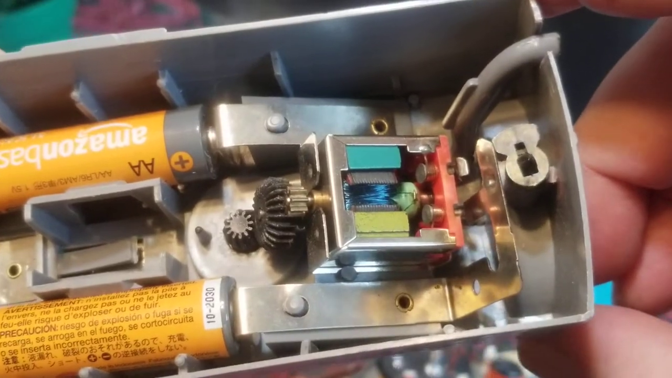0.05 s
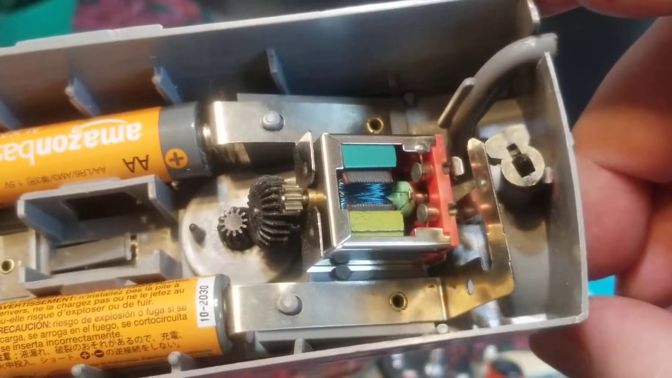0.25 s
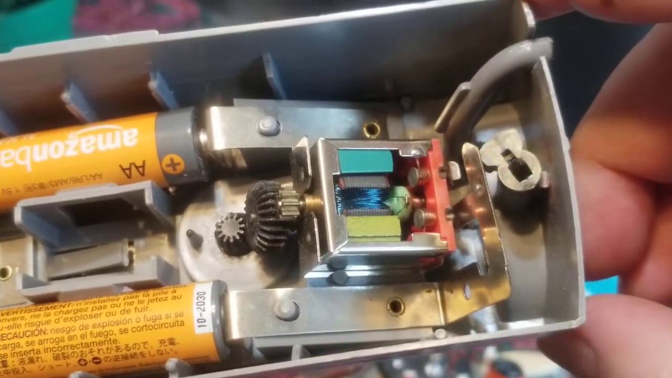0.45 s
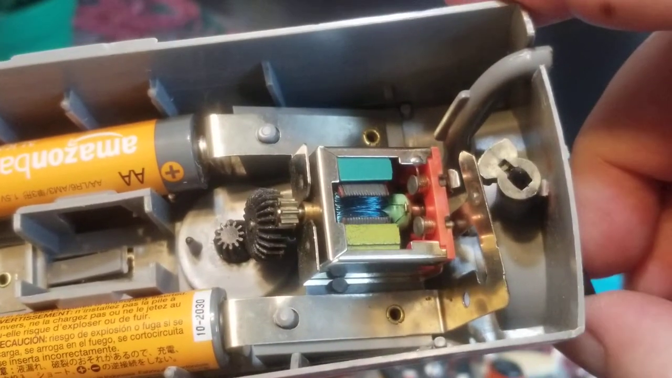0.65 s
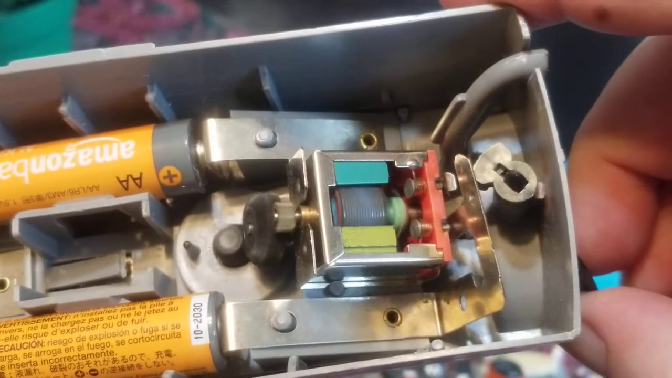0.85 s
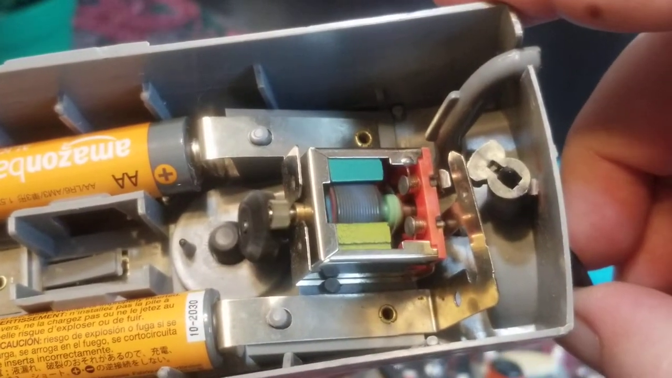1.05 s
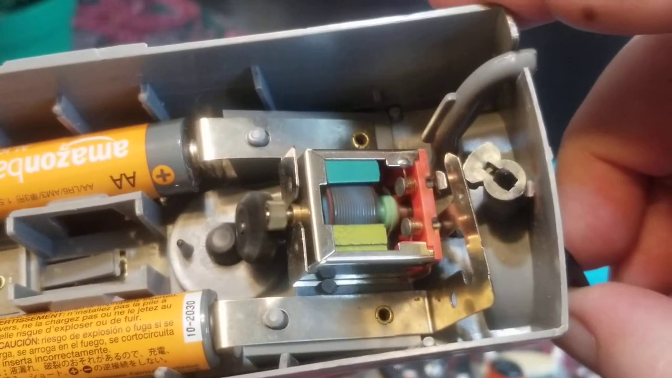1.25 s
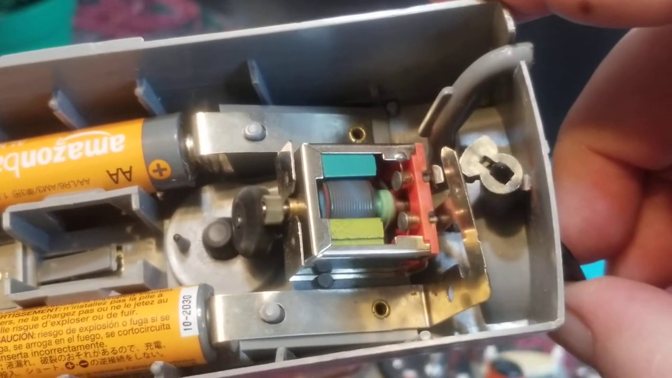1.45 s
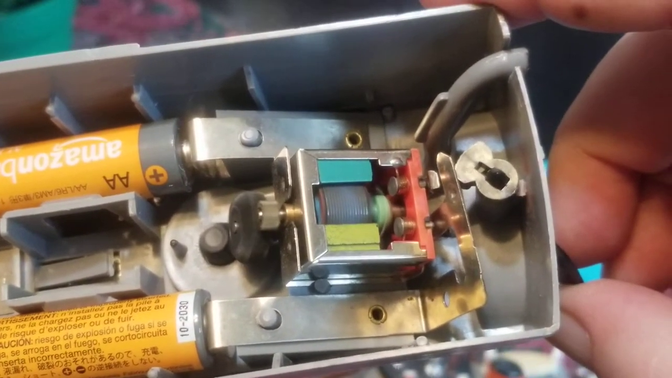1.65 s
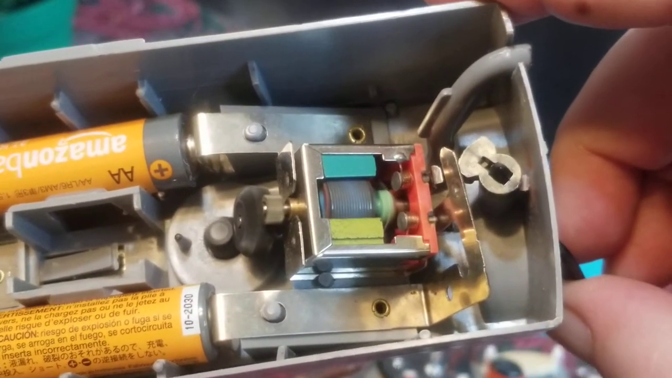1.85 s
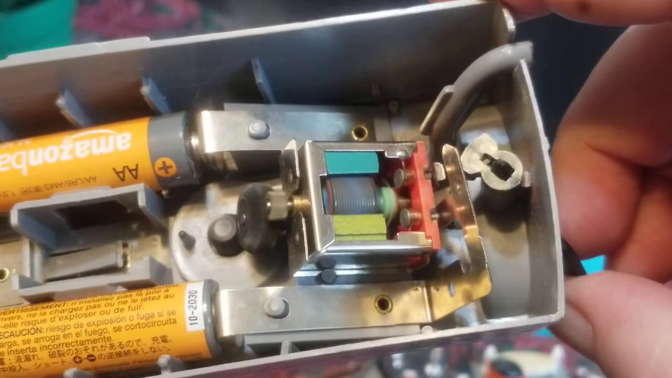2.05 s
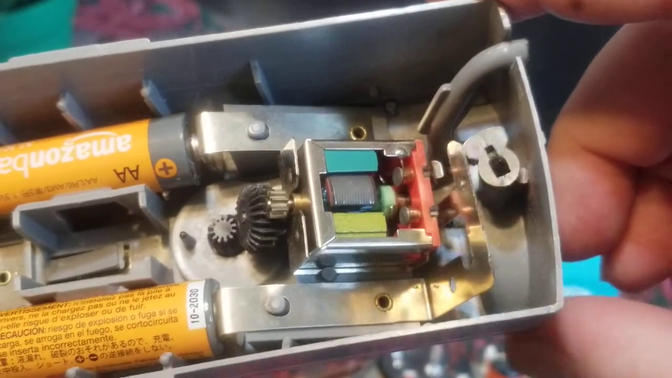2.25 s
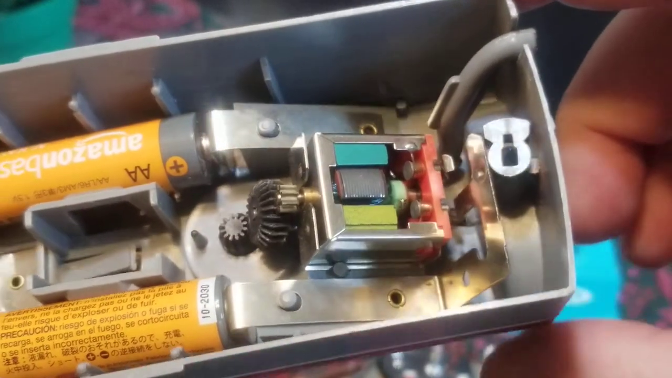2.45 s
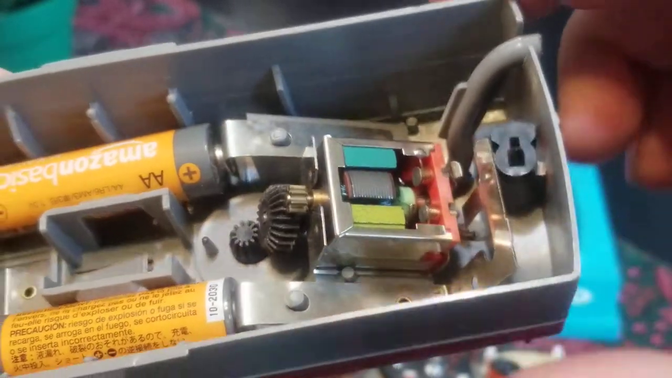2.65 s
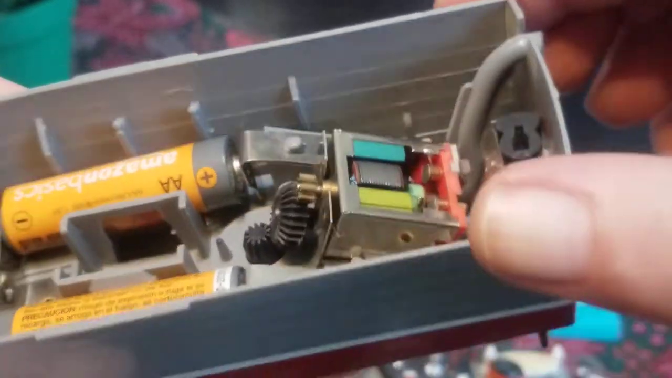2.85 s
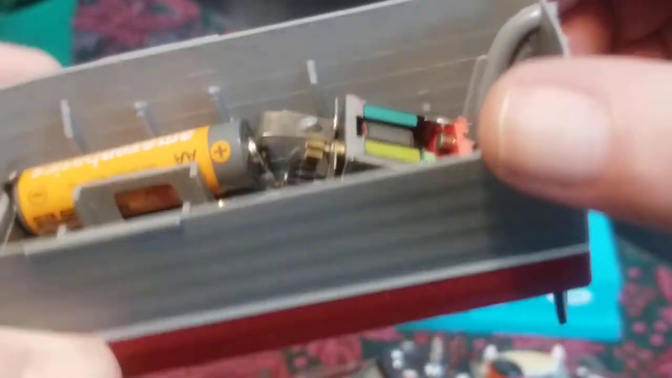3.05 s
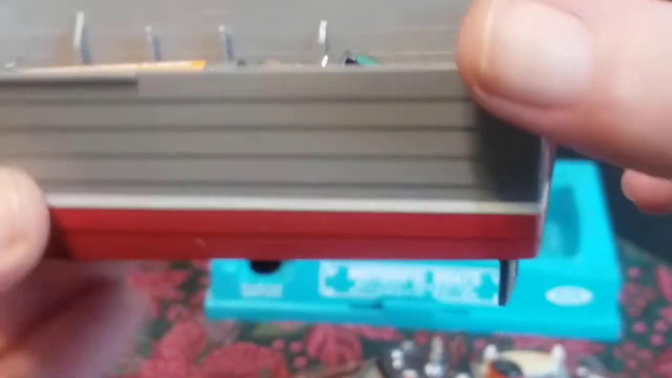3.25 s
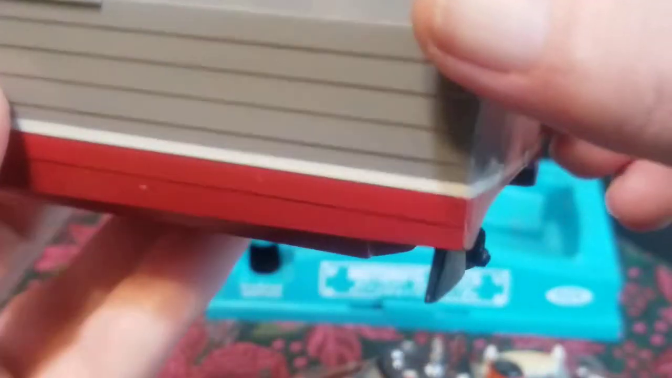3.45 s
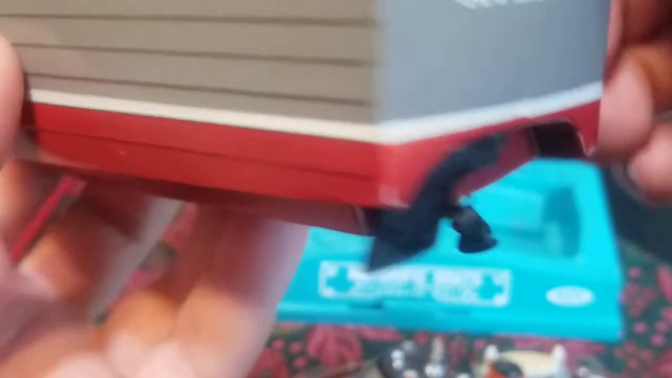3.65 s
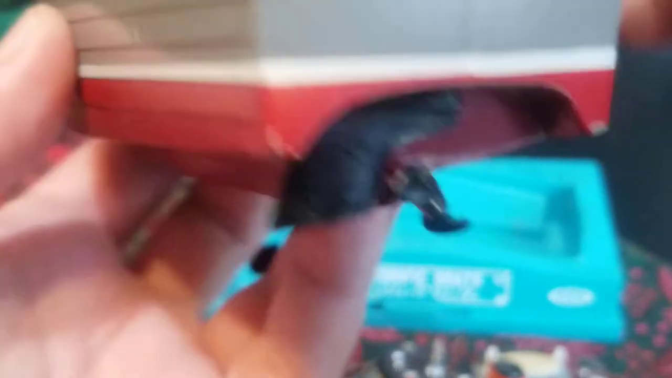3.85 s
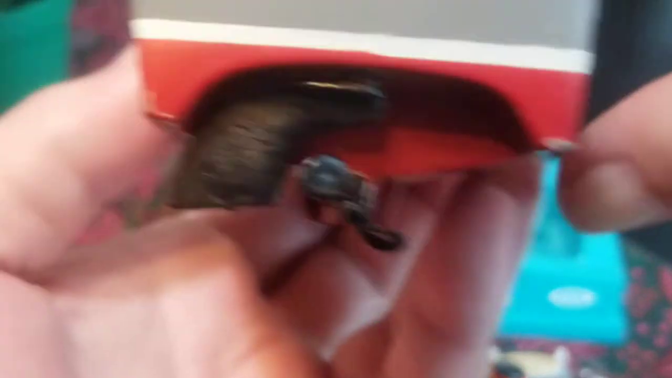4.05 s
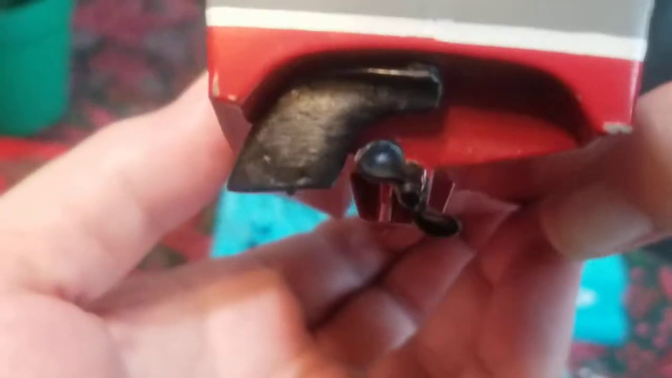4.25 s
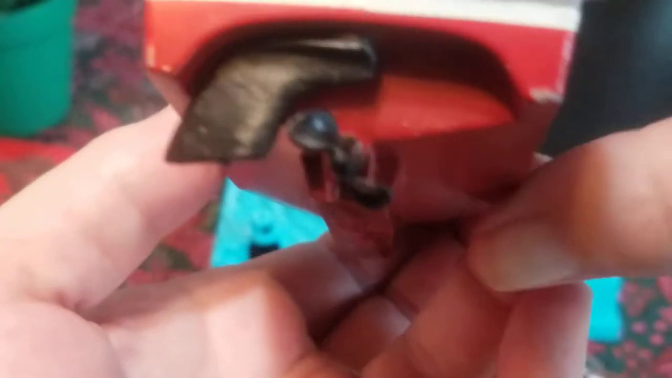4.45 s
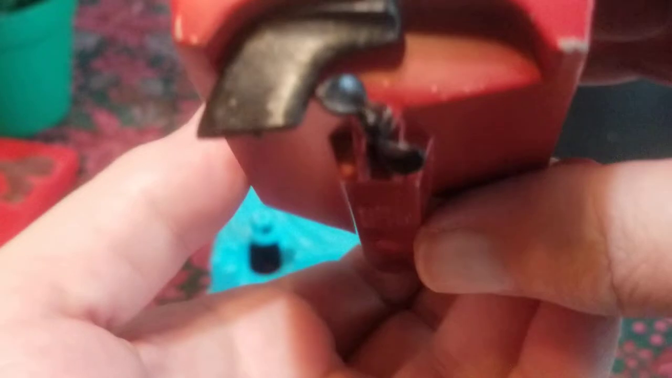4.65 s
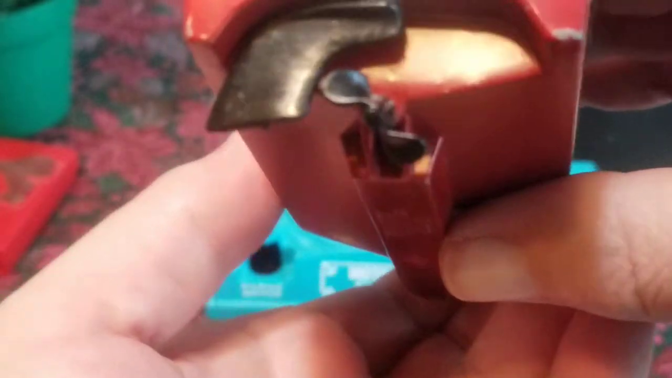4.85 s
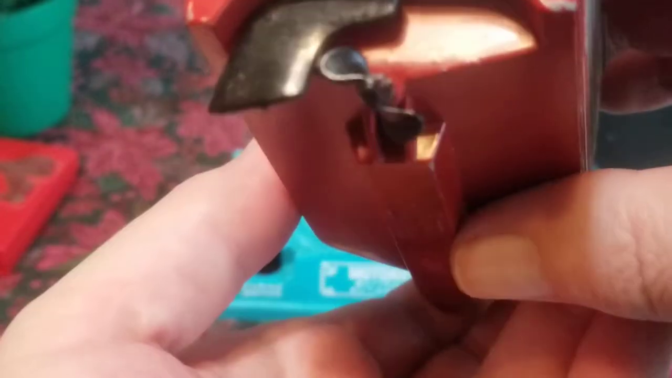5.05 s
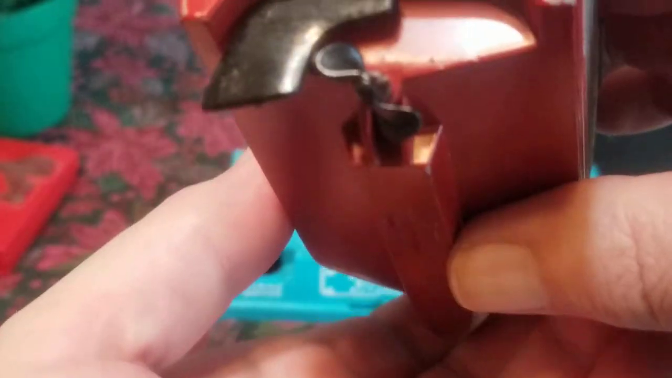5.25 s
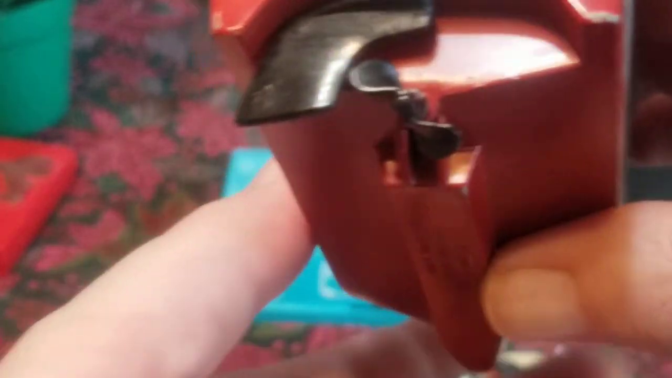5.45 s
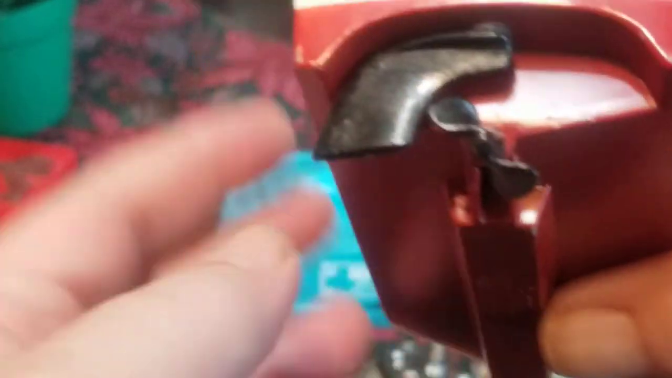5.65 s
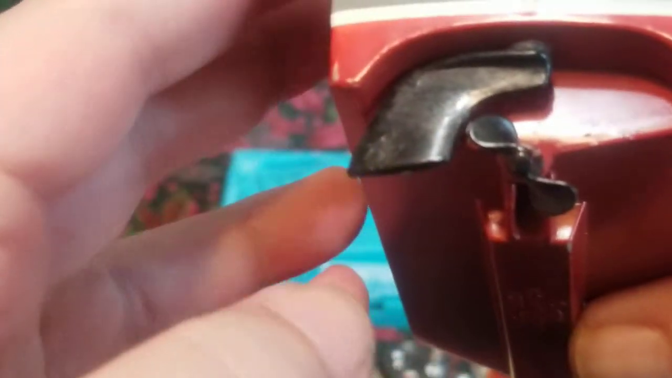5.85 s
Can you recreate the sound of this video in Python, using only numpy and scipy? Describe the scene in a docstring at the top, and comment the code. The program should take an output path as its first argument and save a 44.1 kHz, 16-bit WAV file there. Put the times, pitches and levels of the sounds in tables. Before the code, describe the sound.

Low appliance hum, then loud raspy chatter of loose toy gears in a plastic hull, cut short, followed by faint handling clicks, rubs and squeaks.

```python
"""An appliance hums over soft hiss; then a toy boat's small battery motor runs for over a second.
Its loose gear teeth strike, slap and grind, and the plastic hull rings with them.
Fingers then turn the hull over: light taps, one click, rubbing, and a few thin squeaks in the room.
The hum is made of sines, the gears and rubbing of tiny impacts, the taps of brief knocks and noise.
A gain control turns everything down while the gears are loud, so the hum sinks with them."""
import sys
import numpy as np
from scipy import signal
from scipy.fft import rfft, irfft, next_fast_len
from scipy.io import wavfile
from scipy.ndimage import uniform_filter1d, map_coordinates

SR = 44100
rng = np.random.default_rng(int(sys.argv[2]) if len(sys.argv) > 2 else 0)


def int16_out(signal):
    """Quantize to a 16-bit WAV file."""
    q = np.round(np.clip(np.atleast_2d(signal).T, -1, 1) * 32767)
    wavfile.write(sys.argv[1], SR, q.astype(np.int16))


N = 260391
T = np.arange(N) / SR  # time of each sample in seconds

# How hard the gear teeth press as they mesh. Each row: time in seconds, relative force in dB.
MESH_FORCE = [(0.82, -23.5), (0.92, -25), (1.2, -26), (1.31, -28), (1.39, -26.5), (1.62, -27),
              (1.79, -28.5), (1.9, -28.5), (2.18, -26.5)]


def amp(db):
    """Turn decibels into a gain."""
    return 10 ** (np.asarray(db) / 20)


def unit(x):
    """Scale x to an rms of 1."""
    return x / np.sqrt(np.mean(x ** 2) + 1e-20)


def along(points, hz):
    """Read each column of a table at the frequencies hz, on a logarithmic frequency axis."""
    f, *columns = np.transpose(points)
    return np.array([np.interp(np.log(hz + 1), np.log(f + 1), column) for column in columns])


def curves(rows):
    """Draw each column of a table as straight lines over time, one value per sample."""
    s, *columns = np.transpose(rows)
    return np.array([np.interp(T, s, column) for column in columns])


def wobble(rate):
    """Draw a smooth random curve through rate random points a second."""
    knots = rng.standard_normal(int(N * rate / SR) + 4)
    coarse = T[::16]  # every 16th sample is enough
    return np.interp(T, coarse, map_coordinates(knots, [coarse * rate]))


def filtered(x, response):
    """Multiply the spectrum of x by a response, which may be complex."""
    size = next_fast_len(N + SR // 4)
    hz = np.fft.rfftfreq(size, 1 / SR)
    return irfft(rfft(x, size) * response(hz), size)[..., :N]


def tones(lines, drift):
    """Add sines whose phase wanders slowly, the higher ones more."""
    wander = wobble(6)
    total = 0
    for hz, db in lines:
        turns = hz * (T + drift * wander) + rng.random()
        total = total + amp(db) * np.sin(2 * np.pi * turns)
    return np.sqrt(2) * total


def background(rotor_hz=58.92, air_db=-57, flutter_db=0.5):
    """A turning motor hums at multiples of its speed, over a soft rush and a faint whine on the left."""
    # The appliance's motor. Each row: multiple of its speed, relative level in dB.
    hum_lines = [(1, -50.5), (2, -66), (3, -62.5), (4, -57.5), (5, -64.5), (6, -62), (7, -70.5), (8, -71.5),
                 (9, -77), (10, -83.5), (11, -82.5), (12, -92.5), (16, -91), (17, -87.5), (18, -97),
                 (19, -93.5), (21, -95.5), (23, -92.5)]
    # Mains hum and a slower rotor. Each row: frequency in Hz, relative level in dB.
    other_lines = [(49.1, -65.5), (120, -66.5), (196.5, -65.5), (272, -71.5), (393, -70)]
    # Faint steady whine. Each row: frequency in Hz, relative level in dB.
    whine_lines = [(6498, -102), (7127, -102.5), (7364, -103.5), (7957, -99)]
    # Strength of hum and rush at the microphones. Each row: time in seconds, gain in dB.
    nearness = [(0, -3), (3.22, -2.5), (3.4, 0), (4.3, -0.4), (5.1, -0.86), (5.9, -0.15)]
    # Room air and microphone hiss. Each row: frequency in Hz, relative left dB, relative right dB.
    hiss_color = [(25, -88.5, -95), (70, -91, -93), (114, -99.5, -96.5), (163, -83.5, -85),
                  (268, -88.5, -87.5), (423, -89, -90), (527, -100, -92), (810, -111, -108),
                  (1200, -112, -111), (2080, -122, -123), (3200, -128, -129), (5285, -129, -131),
                  (7900, -115, -136), (9100, -116, -135), (10700, -108, -120), (12900, -114, -116),
                  (15500, -117, -116)]
    # How alike the hiss is left and right. Each row: frequency in Hz, likeness (1 is identical).
    likeness = [(60, 0.54), (250, 0.67), (500, 0.14), (1000, 0.43), (2500, .15), (10000, .05)]

    hum = tones([(round(k) * rotor_hz, db) for k, db in hum_lines], drift=.00003)
    hum = hum + tones(other_lines, drift=.0001)

    def middle_and_side(hz):
        """Share the noise between a common middle and an opposite side."""
        angle = np.arccos(np.clip(along(likeness, hz)[0], -1, 1)) / 2
        return np.array([np.cos(angle), np.sin(angle)])

    mid, side = filtered(rng.standard_normal((2, N)), middle_and_side)
    air = np.array([mid + side, mid - side])
    air = unit(filtered(air, lambda hz: amp(along(hiss_color, hz))))
    air_gain = amp(air_db + flutter_db * wobble(4))
    whine = tones(whine_lines, drift=.00002) * np.array([[2], [0]])  # left only
    return amp(curves(nearness)) * (hum + air_gain * air) + whine


def grains(rate, scatter_db):
    """Make about rate tiny impacts a second, irregular in time and size, with an rms of 1."""
    chance, size, side = rng.random(N), rng.standard_normal(N), rng.choice([-1, 1], N)
    impact_size = amp(scatter_db * np.clip(size, -2, 2))
    return unit((chance < rate / SR) * side * impact_size)


def scattered(impacts, t30, direct):
    """Each impact arrives directly, then scatters briefly in the open hull, differently at each side."""
    # the scatter's energy falls by 30 dB in t30 seconds
    energy = signal.lfilter([1], [1, -amp(-60 / (t30 * SR))], impacts ** 2)
    scatter = unit(np.sqrt(energy) * rng.standard_normal((2, N)))
    share = np.clip(direct, 0, 1)  # direct share of the power
    return np.sqrt(share) * impacts + np.sqrt(1 - share) * scatter


def radiated(x, band=lambda hz: 1, size=2048):
    """The hull rings after each push, never before, and sounds stronger or weaker at each pitch."""
    # What gears, frame and hull radiate. Each row: frequency in Hz, relative left dB, relative right dB.
    hull_color = [(199, -44.5, -43.5), (700, -39, -43), (1130, -21.5, -27.5), (1500, -18, -25.5),
                  (1940, -13.5, -20), (2338, -23, -29), (2840, -12, -25.5), (3130, -19, -28),
                  (3520, -12, -26.5), (4140, -12, -28), (4647, -17, -30), (5900, -12.5, -27.5),
                  (6420, -15.5, -43), (7740, -1.5, -31.5), (7740, -4.5, -39), (9200, -3, -34),
                  (10120, 5, -12), (11600, 6, -8.5), (12200, 2, -9.5), (14200, -5, -8.5),
                  (15800, -12.5, -19.5)]
    hz = np.fft.rfftfreq(size, 1 / SR)
    # folding the cepstrum puts all the ringing after the push
    cepstrum = irfft(np.log(amp(along(hull_color, hz)) * band(hz) + 1e-6))
    cepstrum[:, 1:size // 2] *= 2
    cepstrum[:, size // 2 + 1:] = 0
    ring = irfft(np.exp(rfft(cepstrum)))
    ring = ring / np.linalg.norm(ring[0])  # unit power gain on the left
    return signal.oaconvolve(np.atleast_2d(x), ring, axes=1)[:, :N]


def shifting(x, depth_db, size=1024):
    """The point of contact moves, so different resonances stand out for a few hundredths of a second."""
    spectrum = signal.stft(x, nperseg=size)[2]
    field = rng.standard_normal(spectrum.shape[1:])
    field = uniform_filter1d(field, size=9, axis=0)  # neighboring frequencies
    field = uniform_filter1d(field, size=4, axis=1)  # neighboring moments
    return signal.istft(spectrum * amp(depth_db * unit(field)), nperseg=size)[1][:, :N]


def drive(on_s=0.8155, off_s=2.186, spin_up_db=8, spin_up_s=0.16, coast_db_per_s=1105):
    """The motor starts at once, gains level as it spins up, and dies away very fast once off."""
    running, coasting = np.maximum(T - on_s, 0), np.maximum(T - off_s, 0)
    gain_db = -spin_up_db * np.exp(-running / spin_up_s) - coast_db_per_s * coasting
    return (T > on_s) * amp(gain_db)


def tooth_force(mesh_db=1.94, slap_db=1.0, chatter_per_s=110, chatter_db=1.24,
                slap_peak_s=0.0022, slap_width_s=.0058):
    """Meshing force flutters with light chatter; hard slaps swell and fade on top."""
    # The gear jolts at switch-on, then at times rides up and slaps back.
    # Each row: moment of contact in seconds, relative strength in dB.
    slap_list = [(0.818, -28.5), (0.8444, -26.5), (0.8669, -22), (0.9564, -21.5), (0.9837, -23.5),
                 (0.9964, -23.5), (1.0715, -18), (1.0904, -18.5), (1.1338, -18), (1.1644, -19.5),
                 (1.2284, -21), (1.2545, -23), (1.3977, -27), (1.4232, -19), (1.5219, -24), (1.5918, -19),
                 (1.6117, -21.5), (1.6404, -20.5), (1.6786, -18.5), (1.7414, -19.5), (1.8153, -21.5),
                 (1.947, -21), (1.9594, -21), (2.0413, -21), (2.0712, -22)]
    mesh = amp(curves(MESH_FORCE)[0] + mesh_db + chatter_db * wobble(chatter_per_s))
    slaps = np.zeros(N)
    for s, db in slap_list:
        from_peak = (T - s - slap_peak_s) / slap_width_s
        slaps += amp(db + slap_db) * np.exp(-from_peak ** 2)
    return np.hypot(mesh, slaps)


def gears(split_hz=7000, grind_hz=750, rasp_db=5.0, knock_db=-6.5, grind_db=-30,
          hardening=1.24, usual_force_db=-21):
    """Loose teeth strike in a dense stream; hard slaps knock the hull more, over a low grinding."""
    strikes = grains(rate=3000, scatter_db=0.5)
    gain = amp(wobble(220)) * drive()
    teeth = gain * scattered(strikes, t30=0.0019, direct=0.53)
    inside = gain * scattered(strikes, t30=0.0056, direct=0.35)
    sliding = gain * amp(curves(MESH_FORCE)[0]) * rng.standard_normal(N)
    force = tooth_force()
    # hull knock grows by hardening dB for each dB of force
    knock = force * (force / amp(usual_force_db)) ** (hardening - 1)

    def below(hz, edge):
        """Share of power kept below an edge in Hz."""
        return 1 / (1 + (hz / edge) ** 16)

    bright = amp(rasp_db) * radiated(force * teeth, lambda hz: np.sqrt(1 - below(hz, split_hz)))
    dull = amp(knock_db) * radiated(knock * inside, lambda hz: np.sqrt(below(hz, split_hz)))
    grind = amp(grind_db) * radiated(sliding, lambda hz: np.sqrt(below(hz, grind_hz)))
    return shifting(bright, depth_db=1.46) + shifting(dull + grind, depth_db=2.0)


def room(x):
    """A small room answers differently at each microphone, its treble mostly dying sooner."""
    # How long the room rings. Each row: frequency in Hz, time to fall by 60 dB in seconds.
    ring_times = [(300, 0.49), (2000, .28), (8000, 0.12), (14000, 0.13)]
    hz, t, noise = signal.stft(rng.standard_normal((2, SR // 3)), SR, nperseg=256)
    decay = amp(-60 * t / along(ring_times, hz).T)
    tail = signal.istft(noise * decay, SR, nperseg=256)[1]
    tail = np.pad(tail / np.linalg.norm(tail[0]), [(0, 0), (130, 0)])  # starts 130 samples late
    return signal.oaconvolve(np.atleast_2d(x), tail, axes=1)[:, :N]


def taps(t60=0.049, blow=12, crunch_share=0.77):
    """Each tap or slap is a clean blow on the shell and a brief crunch, different at each microphone."""
    # A last gear tooth slaps as the motor stops; later, fingers and loose parts tap the boat.
    # Each row: start in seconds, relative tick level in dB, relative shell knock level in dB.
    tap_list = [(2.209, -23.5, -59), (2.949, -58, -69), (3.024, -54.5, -66), (3.033, -55, -71),
                (3.1951, -56, -81), (3.466, -62, -61), (3.68, -60, -70), (4.047, -56, -52),
                (4.0522, -48, -38), (4.0546, -39, -36.5), (4.8266, -55.5, -70)]
    # Resonances of the plastic shell. Each row: frequency in Hz, width in Hz, relative level in dB.
    shell_modes = [(1404, 196, -6.5), (2075, 190, -11.5), (2750, 280, -15.5), (4570, 840, -20),
                   (7600, 4200, -26)]
    ticks, knocks = np.zeros((2, N)), np.zeros((2, N))
    t = np.arange(SR // 10) / SR
    for s, tick_db, knock_db in tap_list:
        crunch = rng.standard_normal((2, len(t))) * amp(-60 * t / t60)
        start = round(s * SR)
        span = slice(start, start + len(t))
        ticks[:, span] += amp(tick_db) * crunch
        knocks[:, span] += amp(knock_db) * (blow * (t == 0) + crunch_share * crunch)

    def shell(f):
        """Add the shell's resonances with alternating sign."""
        total = 0
        for k, (center, width, db) in enumerate(shell_modes):
            damping = 1j * f * width
            total = total + (-1) ** k * amp(db) * damping / (center * center - f * f + damping)
        return total

    return radiated(ticks) + amp([[17], [13]]) * filtered(knocks, shell)


def fingers(scuff_db=-19, scuff_hz=4600):
    """Skin slips over plastic in tiny grains: a hiss from the hull and a duller scuff at the contact."""
    # Skin slides over the hull. Each row: middle in seconds, half length in seconds, relative level in dB.
    rub_list = [(3.049, 0.03, -65.5), (3.482, 0.063, -69.5), (4.576, 0.011, -60), (4.629, 0.018, -58),
                (4.71, 0.029, -63.5), (4.883, .04, -65.5), (4.983, 0.024, -64), (5.7, 0.12, -76.5)]
    stroke = sum(amp(db) * np.exp(-.5 * ((T - s) / half) ** 2) for s, half, db in rub_list)
    skin = scattered(grains(rate=1400, scatter_db=5.5), t30=0.012, direct=0.057)
    slips = stroke * skin * amp(0.53 * wobble(33))

    def scuff(hz):
        """One broad resonance around scuff_hz."""
        return 2 / (1 + 1j * (hz / scuff_hz - scuff_hz / (hz + 1)))

    return radiated(slips) + amp(scuff_db) * filtered(slips, scuff)


def squeaks(waver_hz=190):
    """Thin, unsteady squeals swell and die at once, heard largely through the room."""
    # Each row: start in seconds, frequency in Hz, swell time in seconds, relative level in dB.
    squeak_list = [(4.161, 12950, 0.0017, -42), (4.169, 13160, 0.0013, -33.5), (4.615, 2344, 0.011, -79),
                   (4.635, 13550, .003, -42), (4.644, 13600, 0.0019, -38.5), (4.675, 2400, 0.0051, -76),
                   (4.715, 2410, 0.0066, -84)]
    out = np.zeros(N)
    for s, hz, swell, db in squeak_list:
        u = np.maximum(T - s, 0) / swell
        envelope = u * np.exp(1 - u)  # peaks after one swell time
        phase = 2 * np.pi * np.cumsum(hz + waver_hz * wobble(1100)) / SR
        out += amp(db) * envelope * np.sin(phase)
    return out * amp([[2], [4]]) + amp(7.5) * room(out)


def scene():
    """The boat is close to the left microphone; once turned over, more of its sound comes by the room."""
    motor = gears()
    handling = taps() + fingers()
    room_feed = motor * amp([[-12], [-5]]) + handling * amp([[-9], [-5]])
    return background() + motor + handling + room(room_feed) + squeaks()


def gain_control(x, lift_db=8, threshold_db=-36, hold_s=2.2, attack_db_per_s=32,
                 release_db_per_s=13.0, size=441):
    """Quiet passages are lifted; a loud sound pulls the lift down, and it returns after a hold."""
    blocks = x[:, :N // size * size].reshape(2, -1, size)
    power = np.mean(blocks ** 2, axis=(0, 2))
    excess = np.clip(10 * np.log10(power + 1e-12) - threshold_db, 0, lift_db)
    step, cut = size / SR, [0]
    for k in range(len(excess)):
        wanted = excess[max(0, k - int(hold_s / step)):k + 1].max()  # loudest block within the hold
        change = np.clip(wanted - cut[-1], -release_db_per_s * step, attack_db_per_s * step)
        cut.append(cut[-1] + change)
    return x * amp(lift_db - np.interp(T, np.arange(len(cut)) * step, cut))


def record(dry, top_hz=15830):
    """Ride the gain, round off the highest peaks and remove the treble above top_hz."""
    x = gain_control(dry)
    rounded = x / (1 + np.abs(x / .85) ** 6) ** (1 / 6)
    return filtered(rounded, lambda hz: np.clip((top_hz - hz) / 250 + .5, 0, 1))


dry = scene()
out = record(dry)
int16_out(out)
```